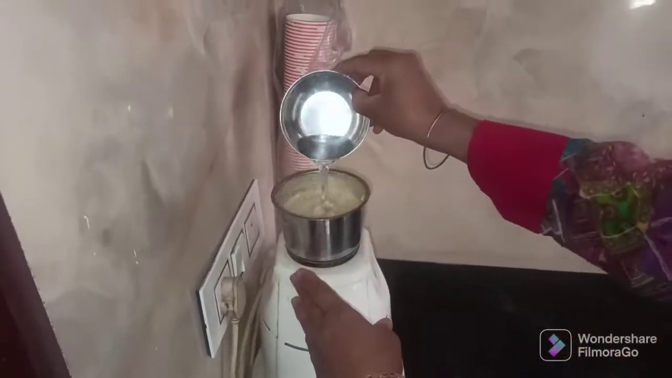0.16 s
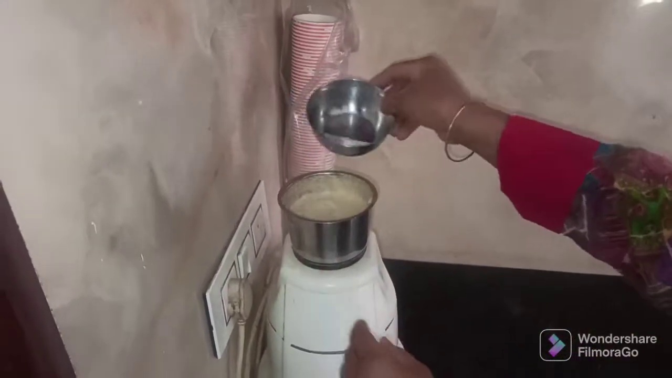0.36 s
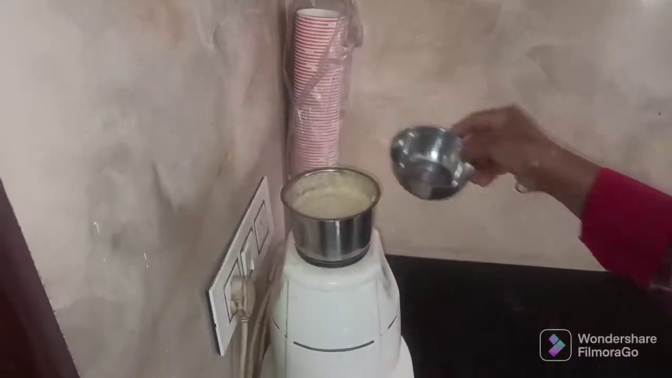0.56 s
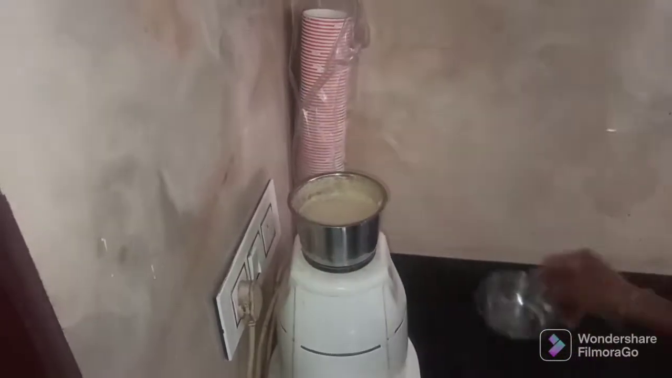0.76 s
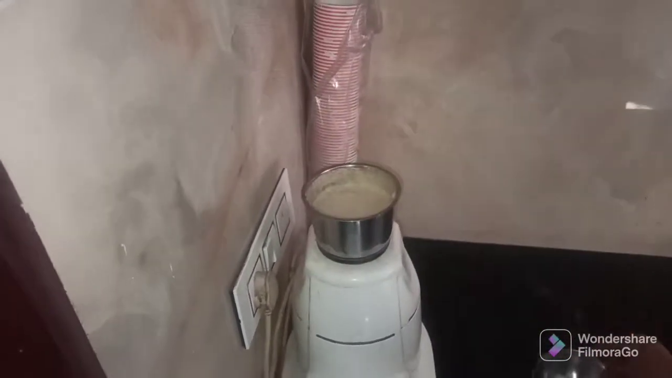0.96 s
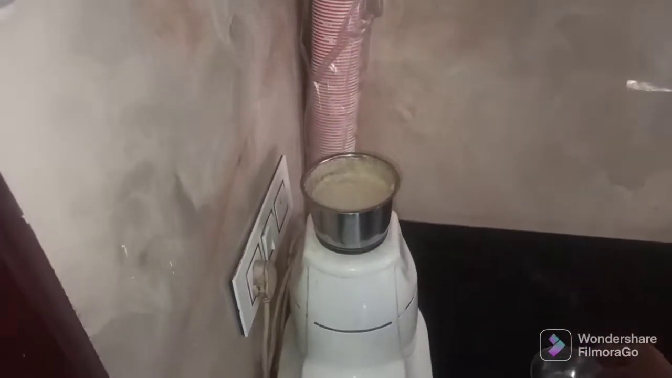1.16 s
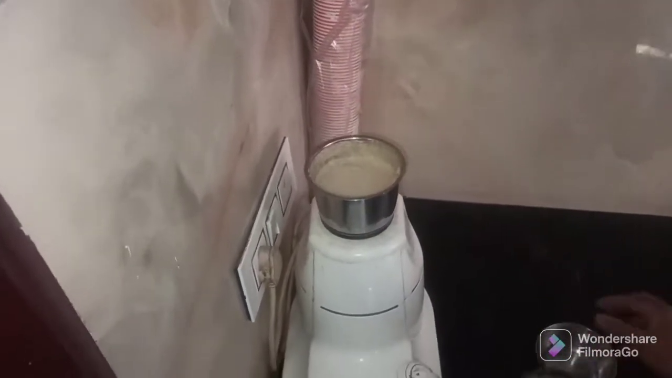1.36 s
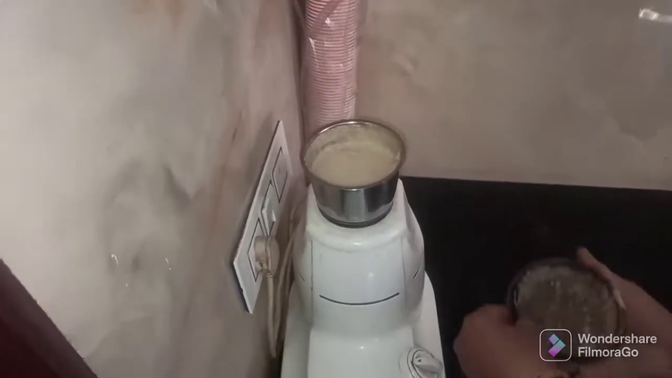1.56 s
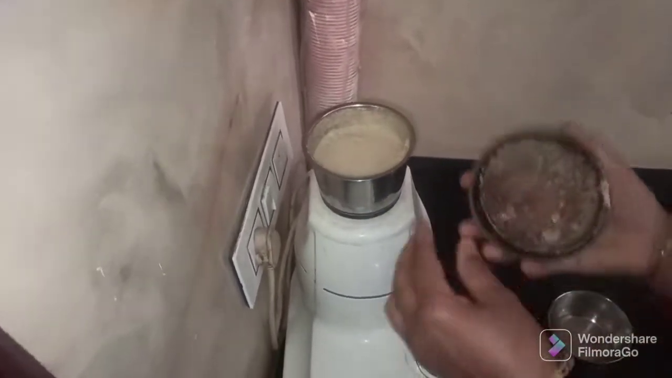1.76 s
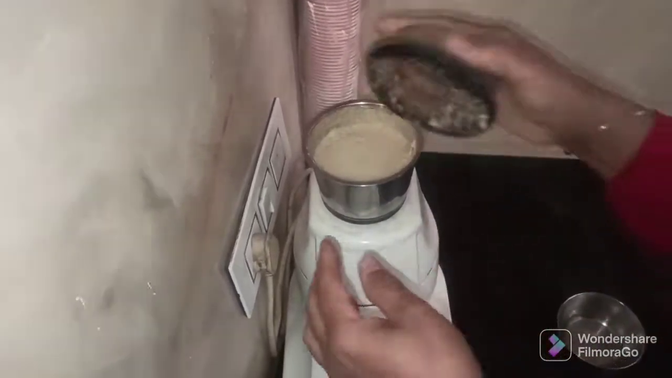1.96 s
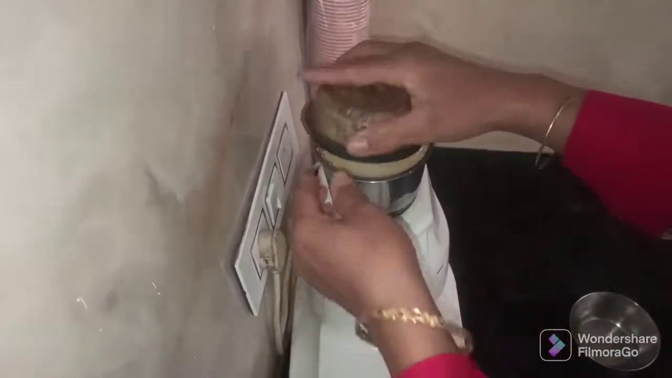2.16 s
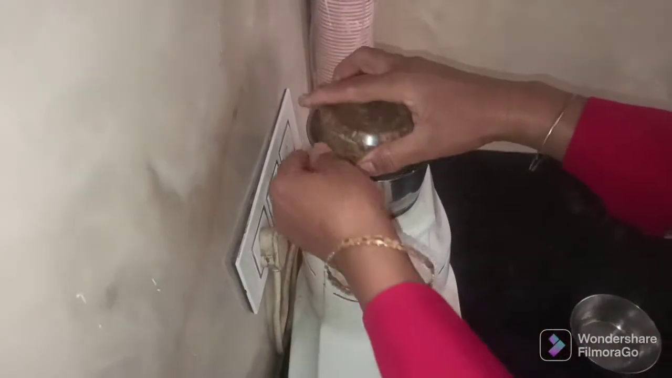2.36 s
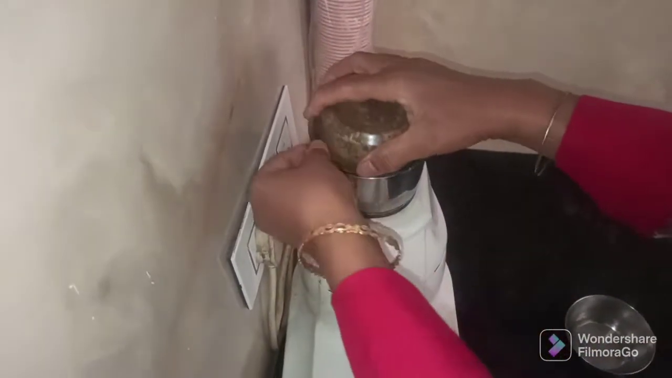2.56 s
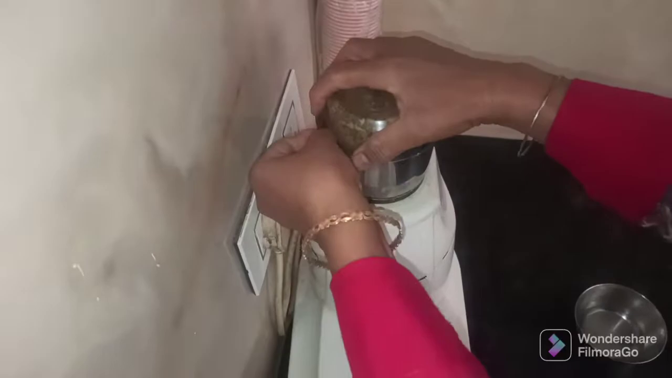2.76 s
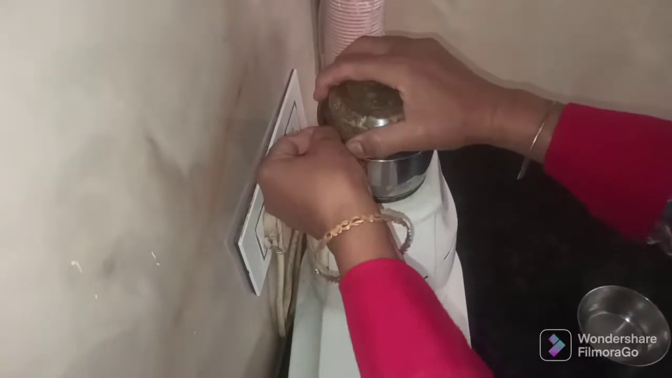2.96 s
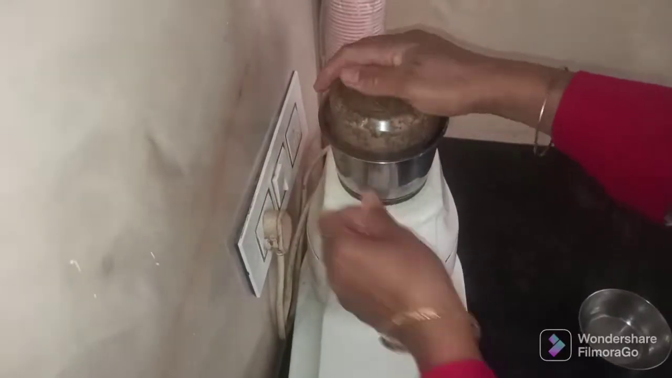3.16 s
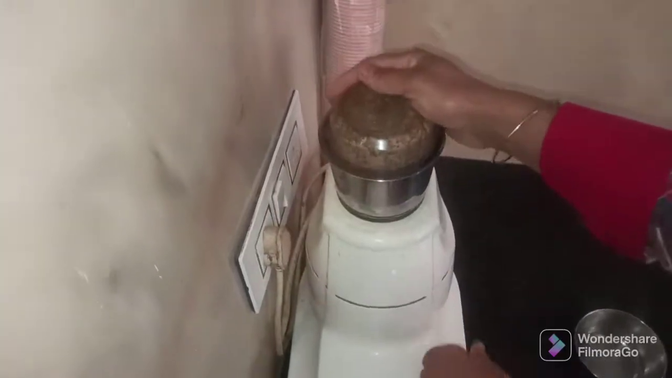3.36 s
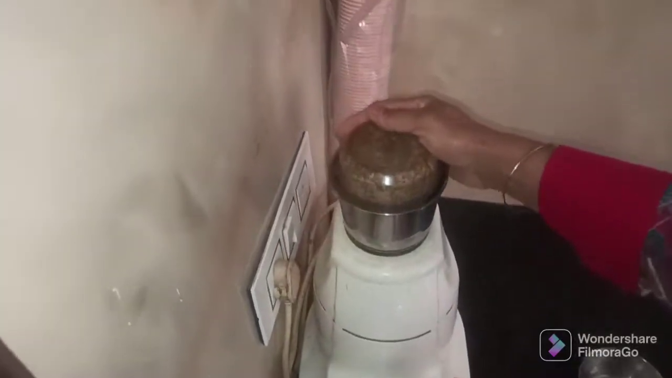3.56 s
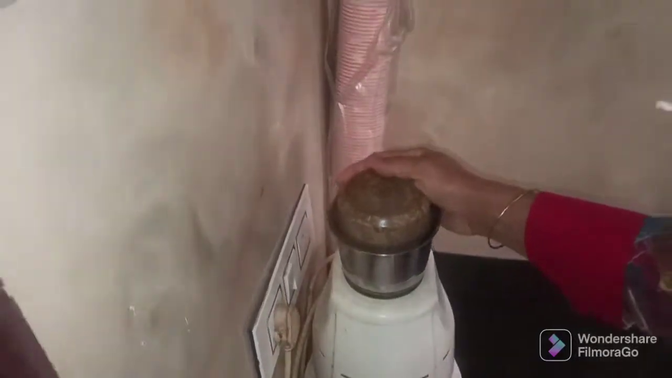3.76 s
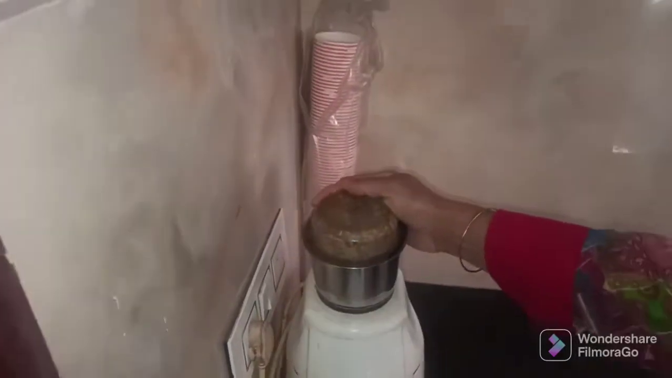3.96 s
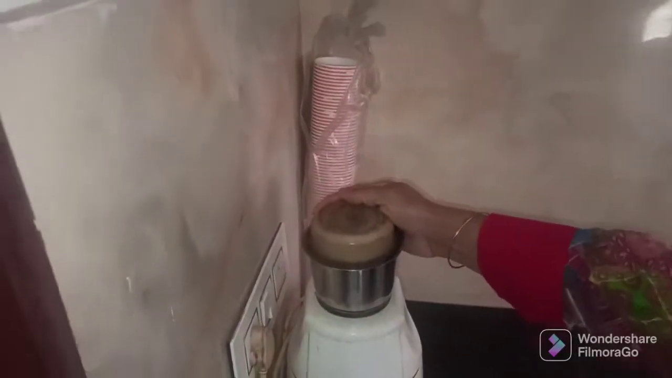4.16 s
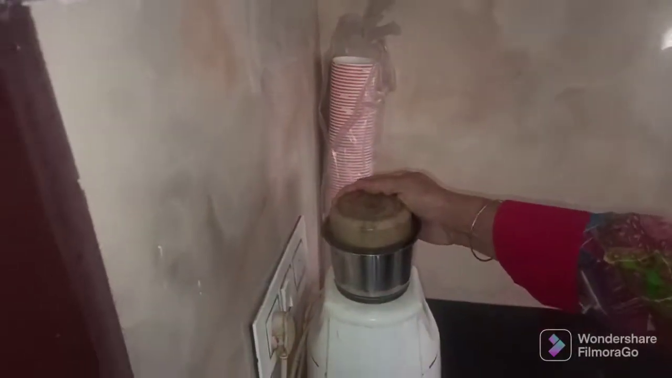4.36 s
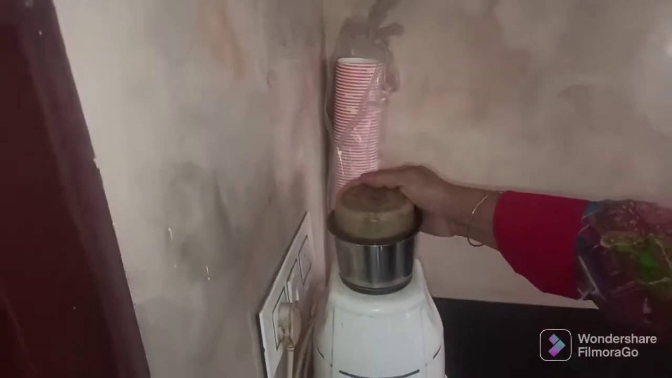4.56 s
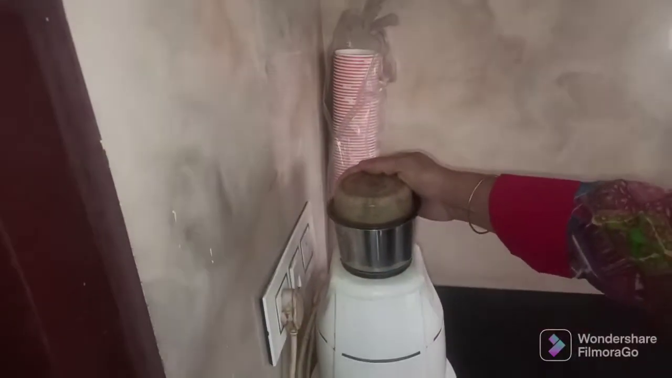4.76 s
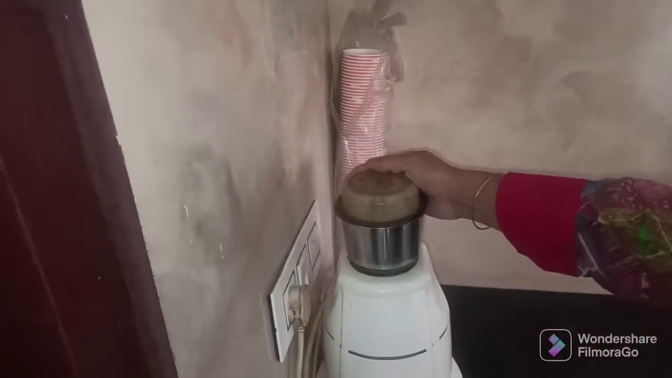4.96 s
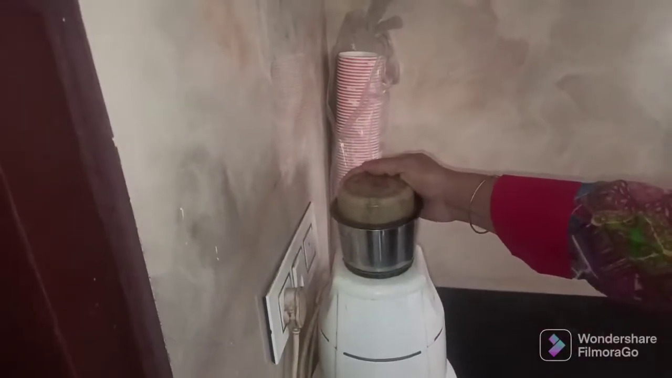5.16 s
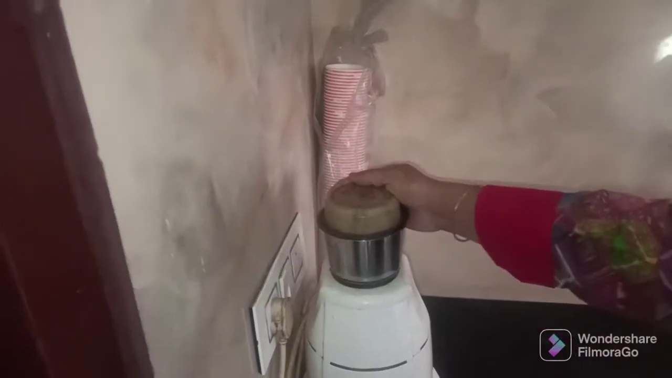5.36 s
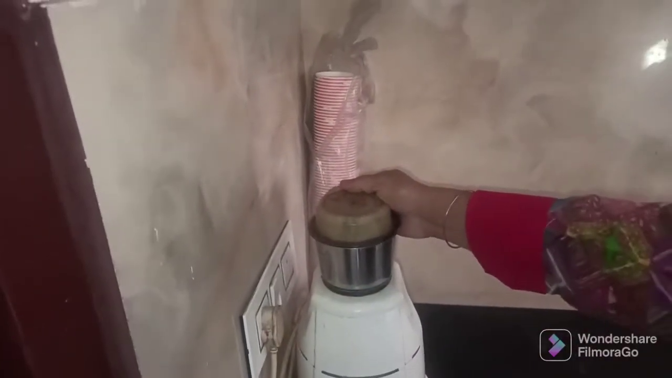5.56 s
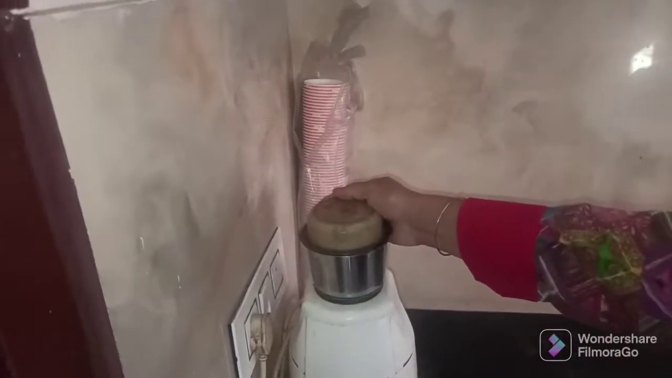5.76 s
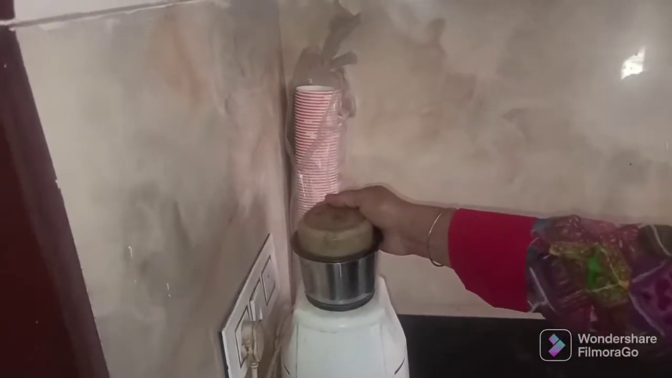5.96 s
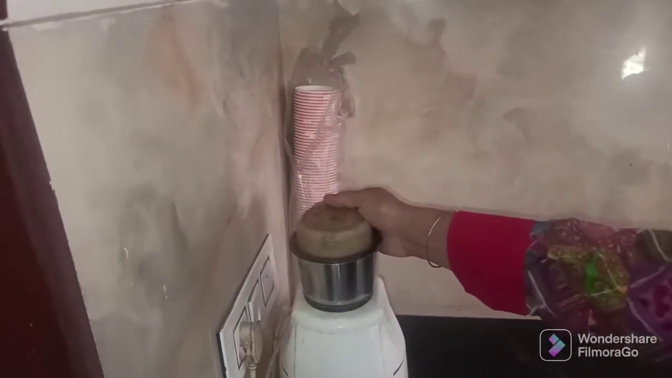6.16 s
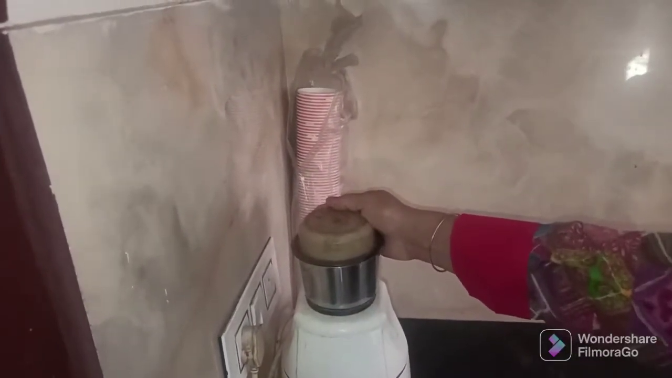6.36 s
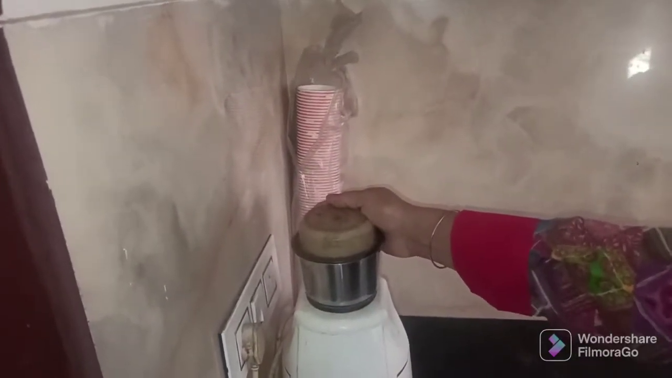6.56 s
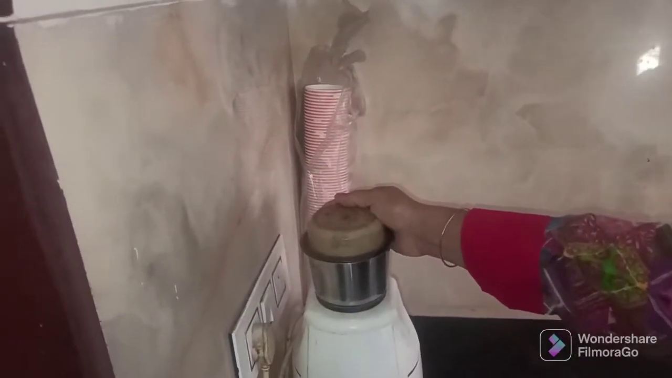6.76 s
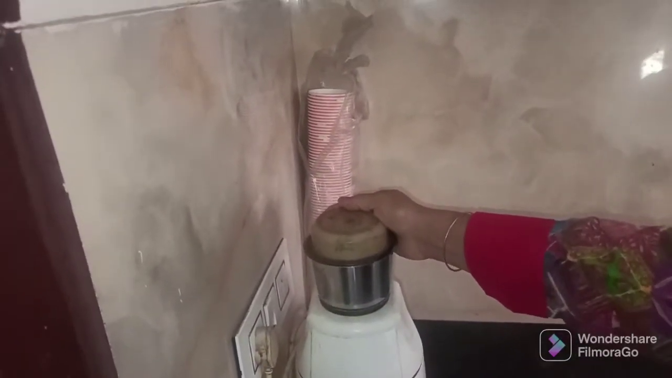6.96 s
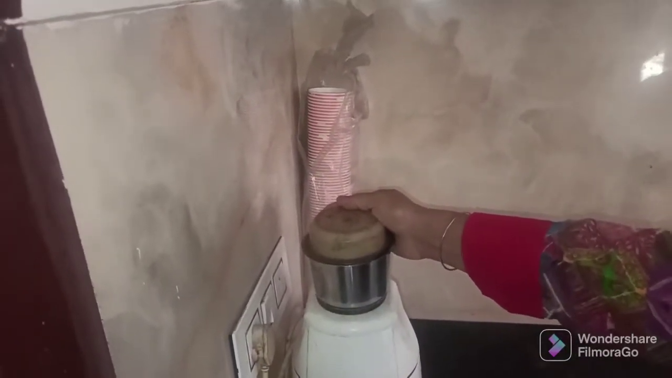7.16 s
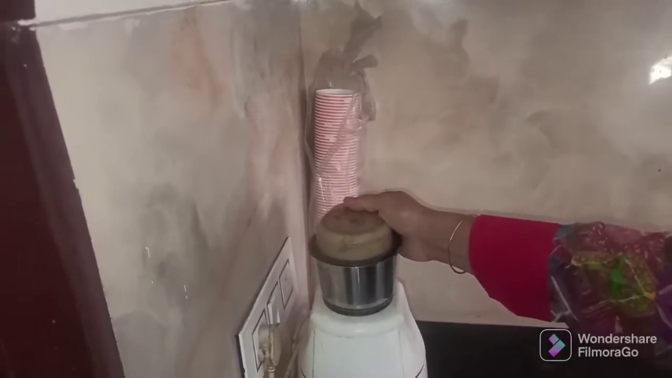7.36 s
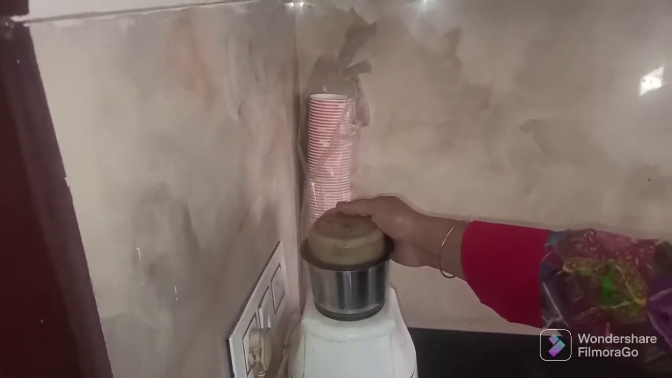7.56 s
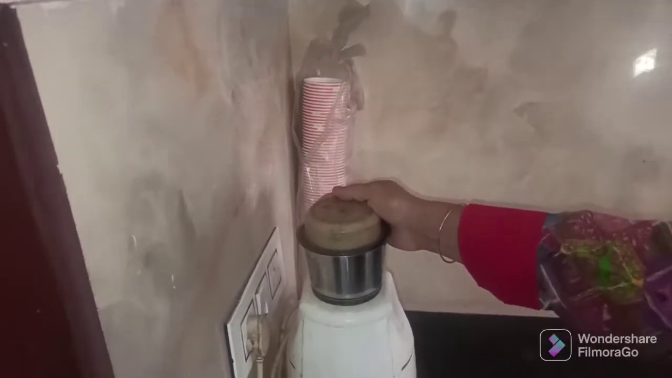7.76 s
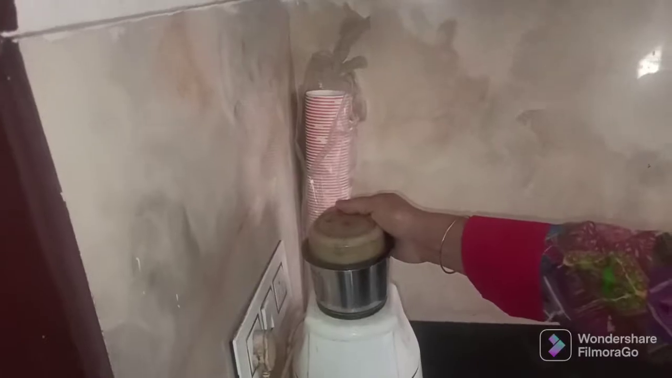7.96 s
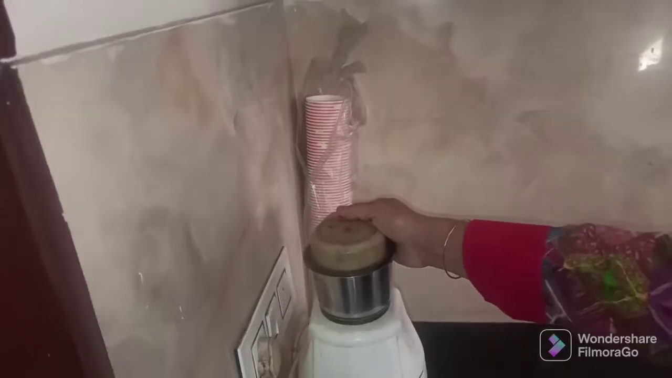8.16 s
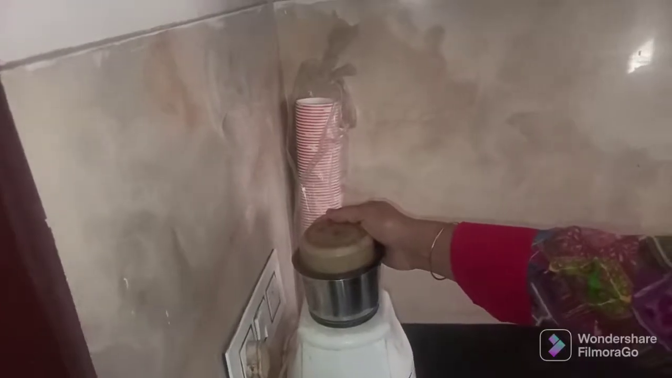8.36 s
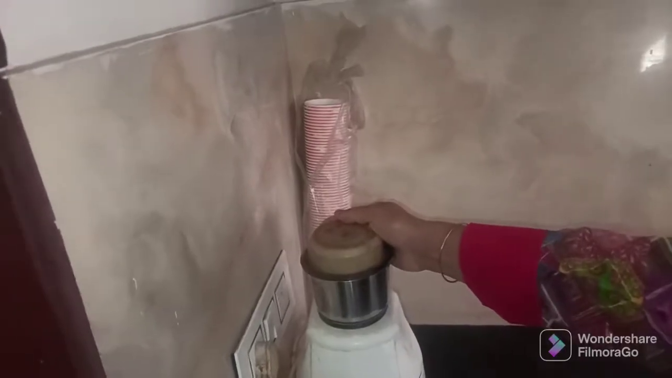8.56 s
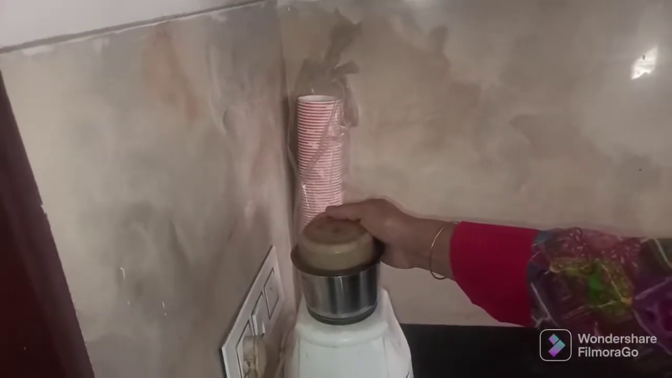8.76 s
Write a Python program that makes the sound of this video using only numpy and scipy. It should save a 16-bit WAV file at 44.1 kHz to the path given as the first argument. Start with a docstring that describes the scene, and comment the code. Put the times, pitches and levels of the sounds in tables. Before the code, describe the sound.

Water splashes, a steel bowl rings, a lid knocks into place, then a kitchen mixer grinder switches on and churns batter with a surging whine.

```python
"""A kitchen mixer grinder churns batter in a corner, over a low room hum. First water is poured into its
steel jar, a steel bowl rings as it is set down on the stone counter, and the lid is knocked and rubbed
into place. Then the motor is switched on. The batter slumps onto the blades and is flung off about five
times a second, so the shaft speed surges. The fan's whine swells whenever its pitch nears a note at
which the housing likes to ring."""
import sys
import numpy as np
from scipy import signal
from scipy.fft import rfft, irfft
from scipy.io import wavfile
from scipy.ndimage import uniform_filter1d

SR = 44100
rng = np.random.default_rng(int(sys.argv[2]) if len(sys.argv) > 2 else 0)


def generate_wav(sig):
    """Save sig (samples, or channels by samples) to the path in sys.argv[1] as 16-bit PCM at SR."""
    pcm = np.round(np.clip(np.atleast_2d(sig).T, -1, 1) * 32767).astype(np.int16)
    wavfile.write(sys.argv[1], SR, pcm)


N = 388080
T = np.arange(N) / SR
ON_S, MAINS_HZ = 3.938, 100  # when the motor starts; pitch of the electric hum


def undb(db):
    """Turn decibels into a number to multiply by."""
    return 10 ** (np.asarray(db) / 20)


def curve(rows, column=1):
    """Join one column of a table with straight lines over time."""
    rows = np.array(rows)
    return np.interp(T, rows[:, 0], rows[:, column])


def unit(x):
    """Scale a signal to an average strength (rms) of 1."""
    return x / np.sqrt(np.mean(x ** 2))


def noise():
    """White noise of strength 1."""
    return rng.standard_normal(N)


def drift(rate):
    """A random wander of strength 1 that picks a new goal `rate` times a second."""
    return unit(np.interp(T * rate, np.arange(N), noise()))


def since(start):
    """Seconds gone by since a moment, zero before it."""
    return np.maximum(T - start, 0)


def swell(mid, half):
    """A bell-shaped rise and fall."""
    return np.exp(-((T - mid) / half) ** 2 / 2)


def fade(start, t60):
    """A sudden start that dies away by 60 dB in t60 seconds."""
    return (T >= start) * np.exp(-np.log(1000) * np.clip((T - start) / t60, 0, 10))


def cut(x, hz, keep, order=1):
    """Keep the "low" or the "high" side of a pitch."""
    return signal.sosfilt(signal.butter(order, hz, keep, fs=SR, output="sos"), x)


def colour(x, points, size=4096):
    """Shape the tone along (pitch [Hz], level [dB]) points."""
    hz, db = np.transpose(points)
    gain = undb(np.interp(np.log1p(np.linspace(0, SR / 2, size // 2 + 1)), np.log1p(hz), db))
    cepstrum = irfft(np.log(gain))[:size // 2]
    cepstrum[1:] *= 2  # so the filter never rings before the sound arrives
    return signal.oaconvolve(x, irfft(np.exp(rfft(cepstrum, size))))[:len(x)]


def colour_noise(sides, points):
    """Shape left and right noise along (pitch [Hz], level [dB per Hz]) points."""
    return np.array([colour(side * np.sqrt(SR / 2), points) for side in sides])


def band(x, hz, width):
    """A resonance: it lets through the pitches near hz."""
    return signal.lfilter(*signal.iirpeak(min(hz, SR * .45), hz / min(width, SR / 4), fs=SR), x)


def pitched_noise(hz, width):
    """Noise of strength 1, narrowed until it has a pitch."""
    return unit(band(band(noise(), hz, width), hz, width))


def thud(start, hz, width, t60):
    """A dying burst, dulled by the soft contact, rings a resonance; its loudest 10 ms have strength 1."""
    burst = rng.standard_normal(SR) * np.exp(-np.log(1000) * np.minimum(T[:SR] / t60, 10))
    soft = cut(burst, min(hz + 2 * width, SR * .45), "low", order=2)
    ring = band(band(soft, hz, width), hz, width)
    loudest = np.sqrt(uniform_filter1d(ring ** 2, SR // 100, mode="constant").max())
    return np.pad(ring / loudest, (int(start * SR), N))[:N]


def room(x, echo_db, t60=0.91, bass_hz=600, treble_loss_db_per_s=60):
    """Add an echo on each side at the same overall power; the walls soak up treble, bass stays direct."""
    t = T[:SR]
    tails = rng.standard_normal((2, SR)) * np.exp(-np.log(1000) * t / t60) * (t > .002)
    dull = cut(tails, 5000, "low", order=2)
    tails = dull + (tails - dull) * undb(-treble_loss_db_per_s * t)
    tails *= 1 + 2.3 * np.exp(-t / 0.026)  # the corner walls answer first
    tails /= np.sqrt(np.sum(tails ** 2, axis=1, keepdims=True))
    high = cut(x, bass_hz, "high")
    echo = undb(echo_db) * signal.fftconvolve(high[None], tails, axes=1)[:, :N]
    return x - high + (high + echo) / np.hypot(1, undb(echo_db))


def diffuse(source, bass_hz):
    """A lasting noise fills the room: left and right share the bass, but each has its own treble."""
    return cut(source(), bass_hz, "low") + cut([source(), source()], bass_hz, "high")


# how loud the room hums (time [s], level [dB])
HUM_LEVELS = [(.5, -44), (1.55, -46.5), (2.1, -56), (3.4, -59.5), (3.9, -46.5)]
# tone of the room's rumble (pitch [Hz], level [dB per Hz])
RUMBLE_TONE = [(25, -101), (48, -99), (72, -73.5), (130, -77), (260, -83), (500, -88), (1500, -102),
               (15000, -116)]
def room_hum(hz=139.7):
    """A distant appliance hums, with faint octaves above and below, over a low rumble."""
    phase = 2 * np.pi * np.cumsum(hz + 0.62 * drift(3)) / SR
    hum = (np.sin(phase) + undb(-21.5) * np.sin(2 * phase)) * undb(curve(HUM_LEVELS))
    hum += undb(-78.5) * np.sin(phase / 2)
    return np.sqrt(2) * hum + colour_noise(diffuse(noise, 420), RUMBLE_TONE)


# tones of a low scrape and a high swish (pitch [Hz], level [dB])
SCRAPE_TONE = [(100, -7.5), (280, 4), (450, -4), (630, 2.5), (900, -13.5), (1300, -12), (2200, -16),
               (3050, -17.5), (3600, -16.5), (6000, -38)]
SWISH_TONE = [(1000, -8), (2500, -3.5), (4000, 5.5), (5500, 1.5), (7000, 1), (8500, -7.5), (15000, -14)]
def rustle(low_gain, high_gain):
    """A grainy low noise and a finer high one: the sound of both pouring and rubbing."""
    scrape = unit(colour(noise() * undb(3.9 * drift(190)), SCRAPE_TONE))
    swish = unit(colour(noise() * undb(2 * drift(300)), SWISH_TONE))
    return room(scrape * low_gain + swish * high_gain, echo_db=0.61)


def pour(gush_s=0.092):
    """Water gushes into the jar with a low splash and a shorter, high fizz."""
    splash = undb(-51) * np.exp(-np.abs(T - gush_s) / 0.16)
    fizz = undb(-50.5) * np.exp(-np.abs(T - gush_s) / 0.1)
    return rustle(splash, fizz)


# drips and small ticks of handling (time [s], level [dB], pitch [Hz])
TICKS = [(0.119, -44, 517), (.381, -58, 5800), (.383, -56, 2300), (.415, -54, 8100), (.895, -54, 2490),
         (2.514, -58, 3800), (2.549, -52, 1090), (2.711, -51, 560), (2.797, -55, 850), (2.903, -58, 5200),
         (2.93, -56, 5000), (2.94, -59, 5000), (3.229, -50, 1000), (3.431, -51, 550), (3.473, -46, 900),
         (3.577, -55, 800), (3.69, -56, 800), (3.772, -50, 750)]
def ticks():
    """Drips and light touches each make a tiny blow that dies at once."""
    taps = sum(undb(db) * thud(start, hz, width=0.66 * hz, t60=0.026) for start, db, hz in TICKS)
    return room(taps, echo_db=-5)


# rubbing strokes (time [s], half length [s], scrape level [dB], swish level [dB])
STROKES = [(0.58, 0.17, -64, -70), (1.78, 0.15, -58, -66), (1.942, 0.011, -68, -59),
           (2.16, 0.064, -58, -61.5), (2.7, 0.025, -55, -61), (2.74, 0.017, -40, -49),
           (2.919, 0.027, -44, -63), (2.995, 0.033, -53.5, -57.5), (3.156, 0.039, -58, -56.5),
           (3.322, 0.074, -54.5, -51), (3.49, 0.028, -47, -61), (3.668, 0.087, -46, -59)]
def rubbing():
    """The lid, a sleeve and the hands slide along; each stroke scrapes and swishes."""
    scrape = sum(undb(db) * swell(mid, half) for mid, half, db, _ in STROKES)
    swish = sum(undb(db) * swell(mid, half) for mid, half, _, db in STROKES)
    return rustle(scrape, swish)


# the notes of the steel bowl (pitch [Hz], level [dB], time to fade by 60 dB [s])
BOWL_NOTES = [(1520, -2, 0.82), (1631, -18, .5), (2420, 0, 0.45), (2536, 10, 0.43), (2600, -2, .36),
              (2907, -8.5, 0.3), (3970, 5.5, 0.46), (4200, -12, .45), (4540, -18, .35), (5100, -9.5, .28),
              (5935, -1.5, 0.4), (7030, -12, .32), (7310, -10, 0.37), (8370, -5.5, 0.36),
              (12270, -19.5, 0.16), (13010, -14.5, .18), (14050, -20, .15), (14280, -21, .17)]
# the bowl lands and rocks (time [s], ring level [dB], crack level [dB], brightness [dB per octave])
LANDINGS = [(1.0807, -30, 0.5, -1), (1.0822, -27, 0.5, -1), (1.119, -30, -3, 5), (1.135, -28.5, -3.5, -0.5)]
# tone of steel hitting stone (pitch [Hz], level [dB])
CRACK_TONE = [(100, -32.5), (240, -9), (400, -9), (900, -5), (1500, 0), (2150, -9), (2800, -1), (3500, -12),
              (4400, -6), (5500, -18), (6600, -11), (7700, -23), (8500, -31), (12500, -28), (15000, -33)]
def bowl(split_hz=18, build_s=0.0018, lag_s=0.00016):
    """Each landing cracks and feeds the bowl's notes, which flutter as the rim rocks."""
    t = T[:2 * SR]
    arrival = t - np.array([[lag_s], [0]])  # the bowl is on the right, so the left hears it later
    ring = np.zeros((2, N))
    for hz, db, t60 in BOWL_NOTES:
        energy = 0
        for start, ring_db, _, bright_db in LANDINGS:
            age = np.maximum(t - start, 0)
            decay = np.exp(-np.log(1000) * age / t60) * (1 - np.exp(-age / build_s))
            energy += (undb(ring_db + db + bright_db * np.log2(hz / 3000)) * decay) ** 2
        phase, twin_phase, spread = rng.uniform(0, 2 * np.pi, 3)
        twin_hz = hz + split_hz * (1 + 0.5 * np.sin(spread))  # a close twin makes the note waver
        note = np.sin(2 * np.pi * hz * arrival + phase)
        twin = 0.45 * np.sin(2 * np.pi * twin_hz * t + twin_phase)
        depth = 0.45 * min(np.sqrt(hz / 4000), 1.2)
        flutter = 1 + depth * unit(drift(110) + drift(27.9))[:len(t)]
        ring[:, :len(t)] += np.sqrt(energy) * (note + twin) * flutter
    ring *= undb([[-1], [1]])  # louder on the right
    ring = np.array([room(side, echo_db=-9)[i] for i, side in enumerate(ring)])
    hits = sum(undb(db) * (fade(start, 0.01) + 0.08 * fade(start, 0.44)) for start, _, db, _ in LANDINGS)
    crack = undb(-3.5) * colour(hits * noise(), CRACK_TONE)
    return ring + room(crack, echo_db=0.1)


# the notes of the skidding rim (pitch [Hz], level [dB])
SQUEAL_NOTES = [(3987, -13), (7025, -31), (8350, -29.5), (12270, -47), (14270, -45.5)]
def bowl_skid(at_s=1.144, swell_s=0.016):
    """The rim skids on the stone, and friction makes a few of the bowl's notes squeal."""
    tones = sum(undb(db) * np.sin(2 * np.pi * hz * T + .5 * drift(150)) for hz, db in SQUEAL_NOTES)
    return room(tones * np.exp(-((T - at_s) / swell_s) ** 2), echo_db=-7)


# knocks on the lid (time [s], lid level [dB], thump level [dB])
KNOCKS = [(2.267, -35, -48), (2.331, -37, -59), (2.392, -48, -51), (2.509, -39.5, -28.5), (2.547, -46, -37),
          (2.585, -56, -39)]
# the notes of the lid on the jar (pitch [Hz], width [Hz], level [dB], time to fade by 60 dB [s])
LID_NOTES = [(300, 190, 0, 0.12), (634, 145, -8, 0.078), (1000, 300, -25, 0.05)]
def lid_knocks():
    """The lid knocks on the jar as it is pressed home, and the grinder thumps on its feet."""
    lid = sum(undb(lid_db + db) * thud(start, hz, width, t60)
              for start, lid_db, _ in KNOCKS for hz, width, db, t60 in LID_NOTES)
    thumps = sum(undb(db) * thud(start, hz=126, width=68, t60=0.065) for start, _, db in KNOCKS)
    return room(lid + thumps, echo_db=-5)


# squeaks of the lid (time [s], level [dB], pitch [Hz])
SQUEAKS = [(2.742, -48, 2950), (2.93, -54, 4520)]
def lid_squeaks():
    """The lid's rim squeaks on the steel as it turns."""
    squeaks = sum(undb(db) * swell(mid, half=0.01) * pitched_noise(hz, width=540)
                  for mid, db, hz in SQUEAKS)
    return room(squeaks, echo_db=-8)


def switch():
    """The switch snaps on with one short, bright blow."""
    return room(undb(-21.5) * thud(ON_S, hz=1610, width=1400, t60=0.08), echo_db=-5)


# shaft speed before and after the surging (time [s], speed [turns per s])
SPEEDS = [(4.11, 182), (4.17, 174), (4.22, 193.6), (4.28, 198), (4.45, 191), (4.54, 184.5), (4.75, 179),
          (4.86, 179), (4.97, 174.5), (5.04, 179), (5.1, 179), (8.56, 191), (8.8, 186)]
# one surge a row (slowest at [s], speed [turns per s], fastest at [s], speed [turns per s])
SURGES = [(5.17, 174.8, 5.26, 182.3), (5.33, 175.3, 5.43, 181.2), (5.5, 172.7, 5.6, 180.4),
          (5.69, 171.7, 5.82, 183.9), (5.91, 172.9, 6.01, 184.5), (6.09, 177, 6.15, 182.9),
          (6.26, 173.2, 6.38, 183.9), (6.45, 168.9, 6.6, 185), (6.67, 172.5, 6.77, 184.2),
          (6.89, 173.3, 6.99, 183), (7.08, 169.3, 7.19, 190.5), (7.28, 172.3, 7.39, 185.7),
          (7.48, 166.7, 7.6, 193.4), (7.71, 180, 7.81, 188.6), (7.9, 172.9, 8.03, 184.9),
          (8.13, 172.2, 8.23, 187.3), (8.32, 167.5, 8.47, 198.7)]
def shaft_speed():
    """The batter drags the shaft down, then is flung off and lets it speed up again."""
    points = np.vstack([SPEEDS, np.reshape(SURGES, (-1, 2))])
    in_order = points[np.argsort(points[:, 0])]
    return uniform_filter1d(curve(in_order), SR // 40)


def surge(lead_s=0.022, full_gain_hz=7.3):
    """How hard the blades fling the batter, from -1 to 1; it peaks just before the shaft is fastest."""
    speed = shaft_speed()
    extra_speed = speed - uniform_filter1d(speed, SR // 4)
    return np.tanh(np.interp(T + lead_s, T, extra_speed) / full_gain_hz)


# tone of the air and the motor's brushes (pitch [Hz], level [dB per Hz])
HISS_TONE = [(300, -104), (1500, -62.5), (2700, -61.5), (3400, -58), (4300, -56.5), (5200, -61.5),
             (6500, -55), (7400, -51), (7900, -57.5), (11500, -62.5), (13100, -62), (15600, -64)]
def brush_hiss(angle, running, draught_share=0.18, draught_rise_s=0.81):
    """The brushes spark at switch-on; their hiss grows with the cooling air, pulsed by the shaft."""
    flicker = undb(0.72 * drift(25) + 1.42 * drift(400))
    hiss = diffuse(noise, 1180) * (1 + 0.027 * np.cos(angle)) * flicker
    draught = 1 - draught_share * np.exp(-since(ON_S) / draught_rise_s)
    flow = undb(-0.5 + 0.5 * surge()) * running * draught
    spark = undb(1.5) * fade(ON_S, t60=0.046)
    return colour_noise(hiss, HISS_TONE) * (flow + spark)


# the notes of the filled jar and its lid (pitch [Hz], width [Hz], level [dB])
JAR_NOTES = [(295, 16.5, 1.5), (637, 41, 2), (687, 17.6, 3.5), (944, 30, 2.5), (1046, 11, -2.5),
             (1410, 62, 6), (1790, 180, 2)]
# how the batter lies in the jar (time [s], jar ring [dB], shaft unbalance [dB])
BATTER_LIE = [(4.2, -2, 9), (4.55, -2.5, -2), (4.85, -3, 5), (5.9, 2.5, 5.5), (6.15, -2, 1),
              (7.2, 0.5, 1.5), (8.8, -3, 3.5)]
def jar_ring(sound, drift_db=0):
    """A sound makes the jar ring at its own notes, more or less as the batter shifts."""
    ring = sum(undb(db + drift_db * drift(12)) * band(sound, hz, width) for hz, width, db in JAR_NOTES)
    return ring * undb(curve(BATTER_LIE))


# the shaft's tones (multiple of its speed [times], level [dB])
SHAFT_TONES = [(2, -37.5), (3, -37.5), (4, -36), (5, -35.5), (6, -39.5), (7, -41), (8, -42.5), (10, -45.5),
               (14, -41), (18, -54), (32, -54.5)]
# how loud the electric hum is (time [s], level [dB])
MAINS_LEVELS = [(5.22, -48.5), (5.35, -55), (6.0, -60), (6.1, -49.5)]
def motor(angle, running, flutter_db=2.5, jar_share=0.67, surge_db=3.5):
    """Shaft tones flutter with the load and ring the jar; unbalance shakes the base; the mains hums."""
    tones = sum(undb(db + flutter_db * drift(18)) * np.cos(multiple * angle + rng.uniform(0, 2 * np.pi))
                for multiple, db in SHAFT_TONES)
    tones = (tones + jar_share * jar_ring(tones)) * undb(surge_db * surge())
    unbalance = undb(-37.5 + curve(BATTER_LIE, column=2) + 2 * drift(7))
    shake = unbalance * band(np.cos(angle), hz=174.6, width=16)  # the base bounces on its feet
    mains = undb(curve(MAINS_LEVELS) + drift(8.1)) * np.sin(2 * np.pi * MAINS_HZ * T)
    return np.sqrt(2) * (room(running ** 2 * tones, echo_db=-4) + running * (shake + mains))


def slaps(per_s=2500):
    """Many tiny slaps of uneven strength in a wash of swirling noise."""
    hits = noise() * (rng.random(N) < per_s / SR) * undb(2 * noise())
    return unit(unit(hits) + 0.73 * noise())


# tone of the churning batter (pitch [Hz], level [dB per Hz])
CHURN_TONE = [(40, -78.5), (80, -76.5), (155, -61), (210, -52), (380, -51.5), (500, -52), (600, -51.5),
              (780, -54.5), (1200, -53.5), (1600, -64), (2500, -59.5), (5000, -69.5), (12000, -99)]
def churning(angle, attack_s=0.059, thick_s=0.21, thinning_s=0.15):
    """Slaps of batter bunch up once a turn and ring the jar, louder while the batter is still thick."""
    lumps = undb(.6 * drift(35))
    thickness = np.exp(-since(ON_S + thick_s) / thinning_s)
    effort = np.minimum(since(ON_S) / attack_s, 1) * undb(-2.5 + 6.5 * thickness + 1.27 * surge())
    slapping = diffuse(slaps, 850) * (1 + 0.16 * np.cos(angle)) * lumps * effort
    churn = colour_noise(slapping, CHURN_TONE)
    churn += 0.37 * np.array([[1], [-1]]) * band(churn, 1280, 480)  # the left wall throws back the mids
    return churn + jar_ring(churn, drift_db=2)


def first_bite(at_s=4.0):
    """The blades' first bite throws the whole mass about, with a low heave and a shudder."""
    burst = noise() * np.exp(-((T - at_s) / 0.044) ** 2) * (T > ON_S)
    heave = undb(6) * band(band(burst, 270, 190), 230, 165)
    shudder = undb(-24.5) * thud(3.955, hz=102.5, width=24, t60=0.72)
    return heave + shudder


# short pitched swells in the churning (time [s], level [dB], pitch [Hz])
CHURN_SWELLS = [(4.02, -31, 893), (4.04, -23, 560), (4.12, -21, 1000), (4.19, -24.5, 218), (4.19, -25, 940),
                (4.66, -23.5, 683), (4.8, -23.5, 695), (4.89, -22.5, 691), (5.03, -24.5, 680),
                (5.17, -22, 690), (5.3, -27, 296), (5.92, -25, 292), (6.01, -23.5, 649.6),
                (6.12, -28.5, 295), (6.22, -22.5, 680.6), (7.54, -27.5, 339.4), (8.27, -29.5, 294.6),
                (8.43, -28, 225)]
def gulps_and_growl():
    """Short swells of pitched noise: low gulps, and a run near 690 Hz that makes the jar growl."""
    swells = sum(undb(db) * swell(mid, half=0.025) * pitched_noise(hz, width=0.12 * hz)
                 for mid, db, hz in CHURN_SWELLS)
    return room(swells * (T > ON_S), echo_db=-1)


# where the housing rings, near the fan's tone and near its octave (pitch [Hz], width [Hz], level [dB])
HOUSING_NOTES = [(2201.5, 42, 6), (4340, 70, 4)]
# brief swells of the whine (time [s], boost [dB])
WHINE_SWELLS = [(4.163, 2.5), (4.55, 4), (4.97, 5.5), (5.08, 2), (5.27, 2.5), (8.2, 6), (8.78, 4.5)]
def fan_whine(angle, speed, running, blades=12, reach_hz=45):
    """The blade tone and its octave throb with the mains and sweep across the housing's notes."""
    torque = np.sin(2 * np.pi * MAINS_HZ * T)  # the motor's pull pulses with the mains
    phase = blades * angle + 1.1 * torque
    throb = (1 + 0.4 * torque) * undb(2.5 * drift(45))
    tones = np.cos(phase) * throb, np.cos(2 * phase) * throb
    tone, octave = (unit(x + undb(db) * band(x, hz, width))
                    for x, (hz, width, db) in zip(tones, HOUSING_NOTES))
    housing_hz, width_hz, _ = HOUSING_NOTES[0]
    singing = pitched_noise(housing_hz, 2 * width_hz)  # swirling air keeps the housing singing
    singing_db = -7.5 + 14 * np.exp(-since(ON_S) / 1.6)
    whine = room(tone + undb(singing_db) * singing, echo_db=-4)
    whine /= np.sqrt(uniform_filter1d(np.mean(whine ** 2, axis=0), SR // 8))  # even out the level
    in_tune = 1 / (1 + ((blades * speed - housing_hz) / reach_hz) ** 2)
    start_db = 4.5 * np.exp(-since(ON_S) / 1.3)
    swells_db = sum(boost * swell(mid, half=0.023) for mid, boost in WHINE_SWELLS)
    whine_db = -24.5 + 3.5 * in_tune + start_db + swells_db + 0.7 * drift(14)
    return (undb(whine_db) * whine + undb(-38.5) * room(octave, echo_db=-1.8)) * running ** 7


def scene(spin_up_s=0.055):
    """Small kitchen sounds come first; then one turning shaft drives hiss, motor, churning and fan."""
    kitchen = room_hum() + pour() + ticks() + rubbing() + bowl() + bowl_skid()
    kitchen += lid_knocks() + lid_squeaks() + switch()
    running = 1 - np.exp(-since(ON_S) / spin_up_s)
    speed = running * shaft_speed() * (1 + 0.003 * drift(90) + 0.0018 * drift(18))  # a slight tremble
    angle = 2 * np.pi * np.cumsum(speed) / SR
    grinder = brush_hiss(angle, running) + motor(angle, running) + churning(angle)
    grinder += first_bite() + gulps_and_growl() + fan_whine(angle, speed, running)
    return kitchen + grinder


# overall treble colour, with dips near 5 kHz and 9-11 kHz (pitch [Hz], level [dB])
TREBLE_TONE = [(4650, -1), (4850, -5), (6000, -3), (6250, 4), (8450, 1.5), (8750, -14), (9400, -24),
               (9900, -10.5), (11400, -17.5), (11650, 0)]
def record(dry, top_hz=15800):
    """Colour the treble, round off the tallest peaks and cut the very top."""
    coloured = np.array([colour(side, TREBLE_TONE) for side in dry])
    rounded = coloured / (1 + np.abs(coloured / .85) ** 6) ** (1 / 6)
    return signal.sosfilt(signal.ellip(10, .2, 70, top_hz, fs=SR, output="sos"), rounded)


dry = scene()
out = record(dry)
generate_wav(out)
```